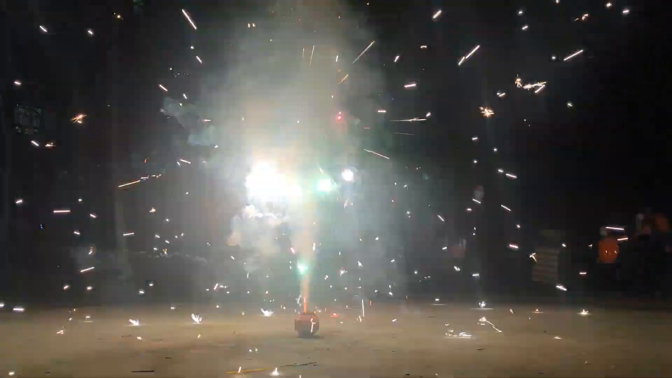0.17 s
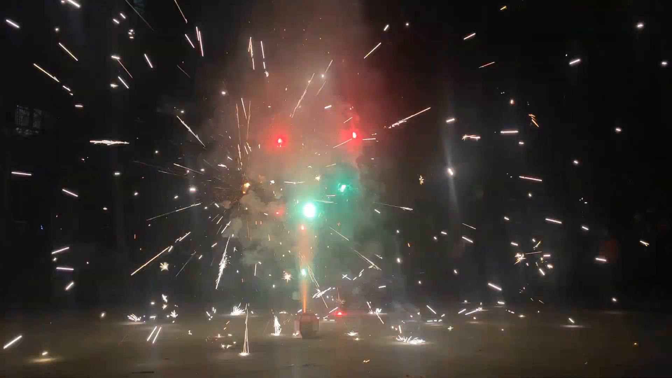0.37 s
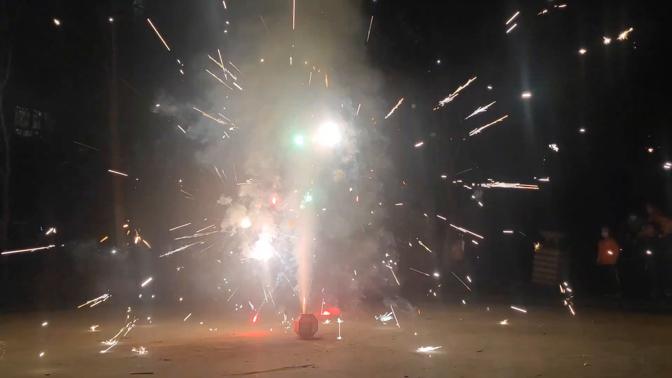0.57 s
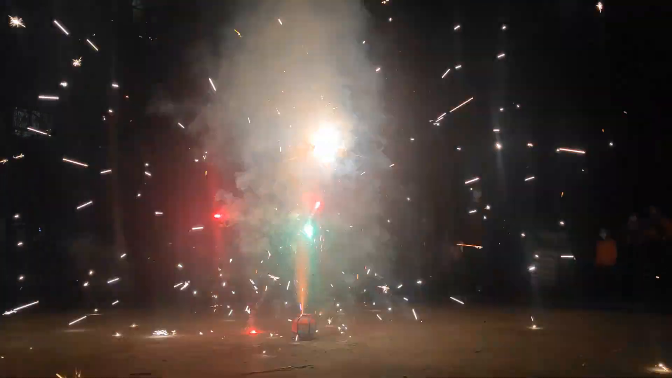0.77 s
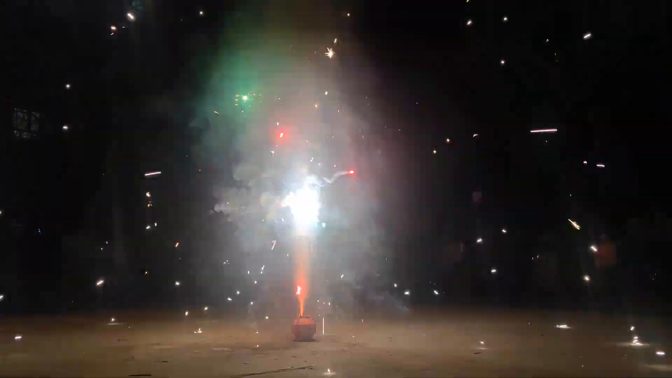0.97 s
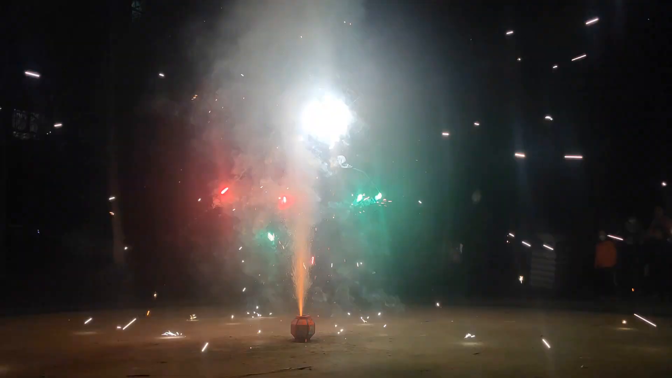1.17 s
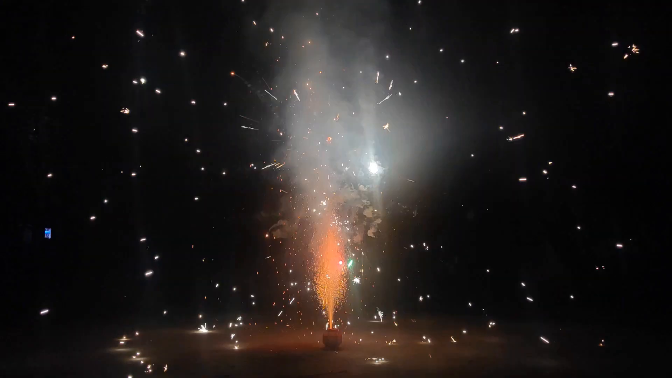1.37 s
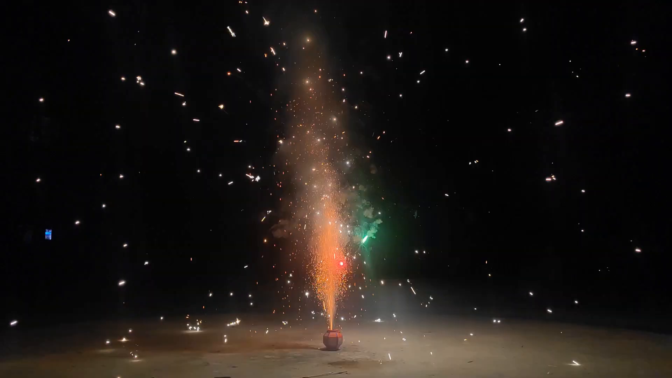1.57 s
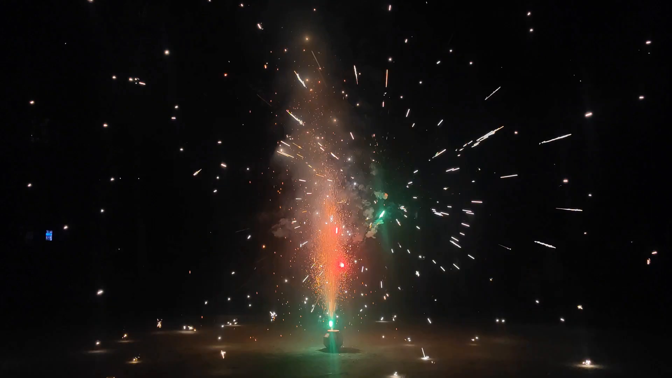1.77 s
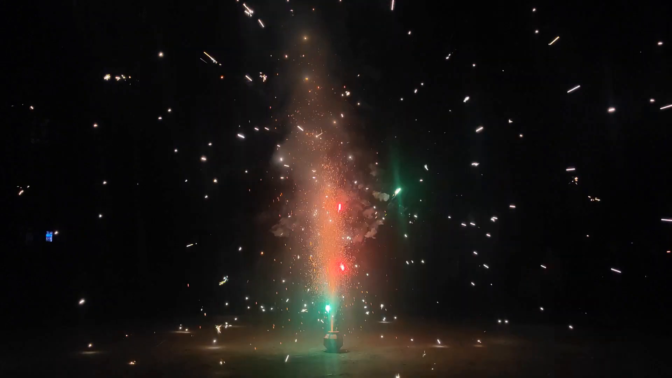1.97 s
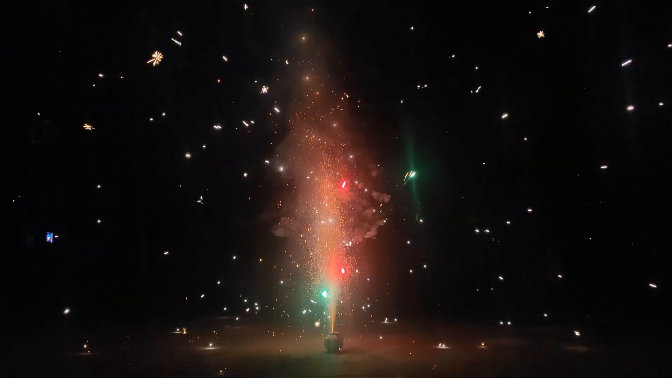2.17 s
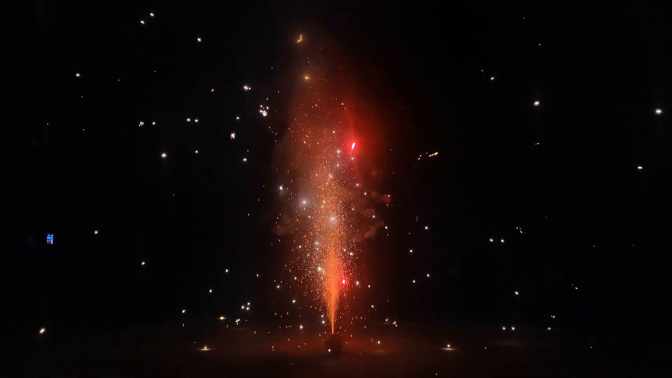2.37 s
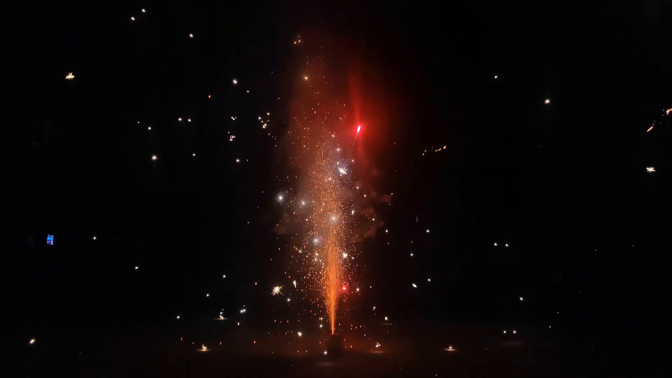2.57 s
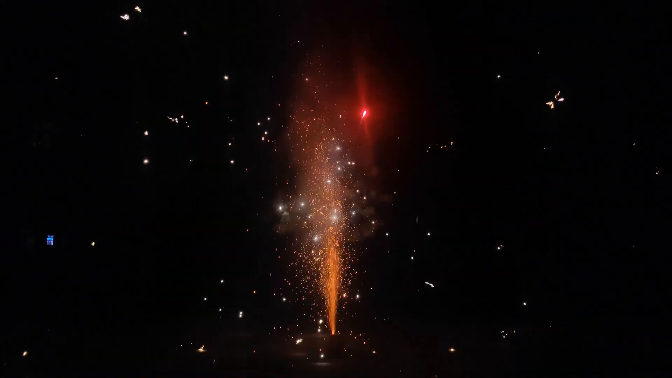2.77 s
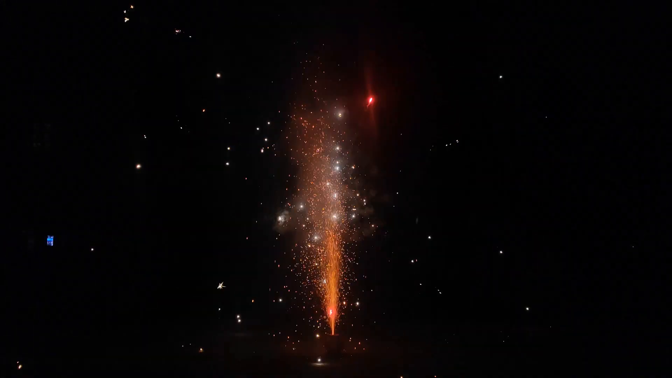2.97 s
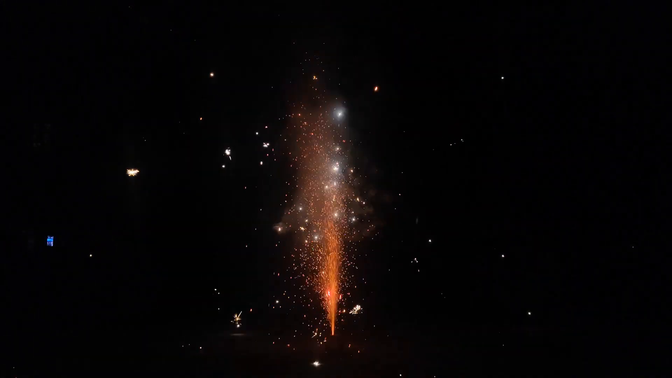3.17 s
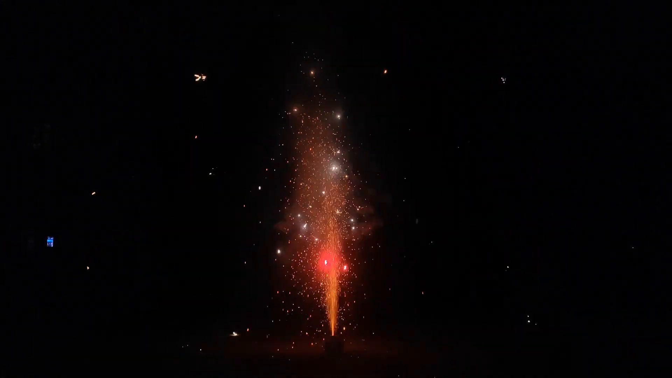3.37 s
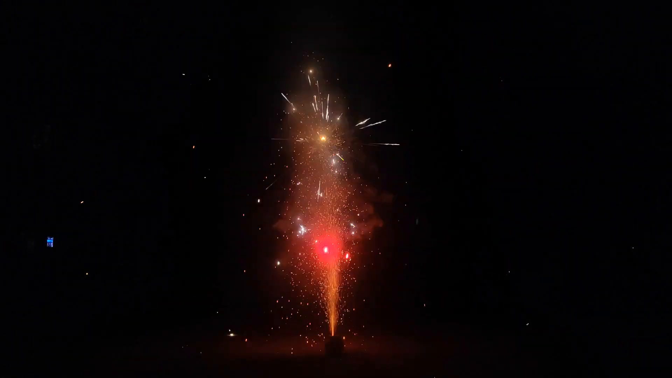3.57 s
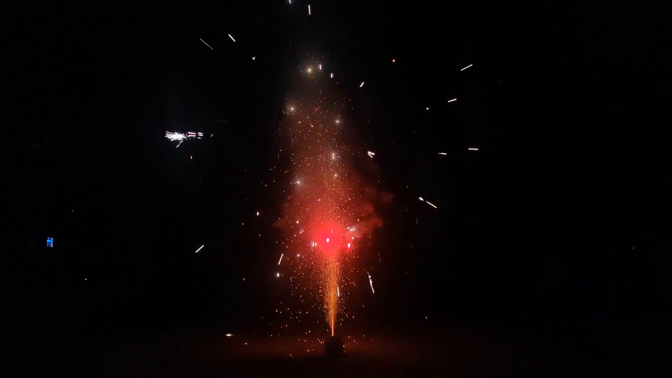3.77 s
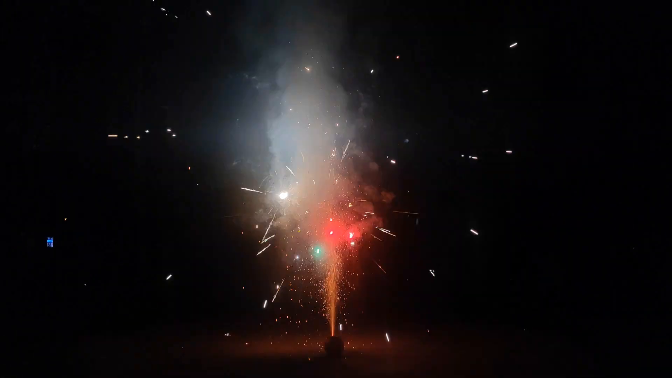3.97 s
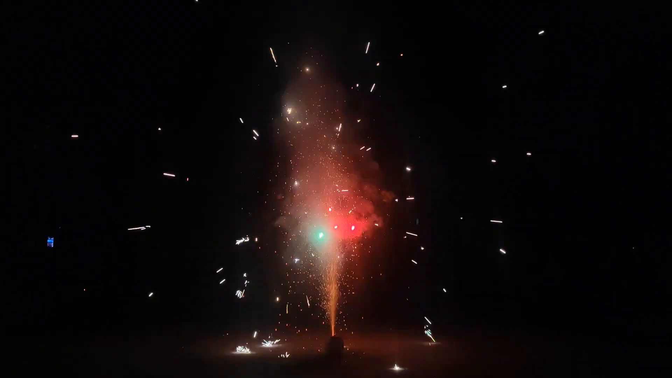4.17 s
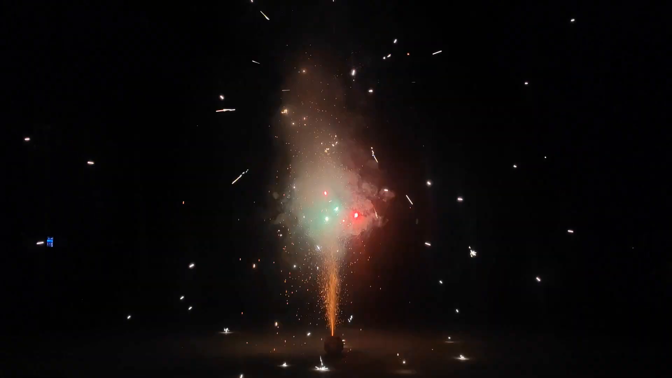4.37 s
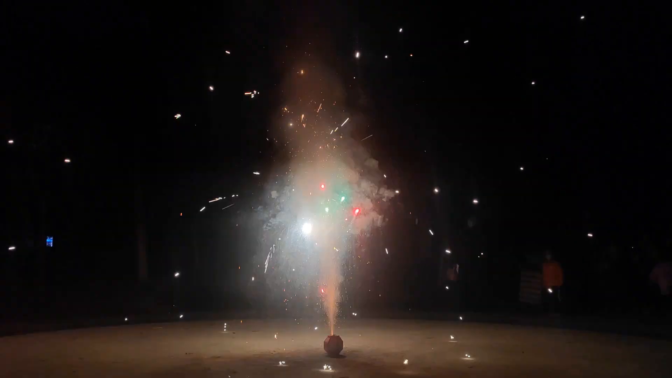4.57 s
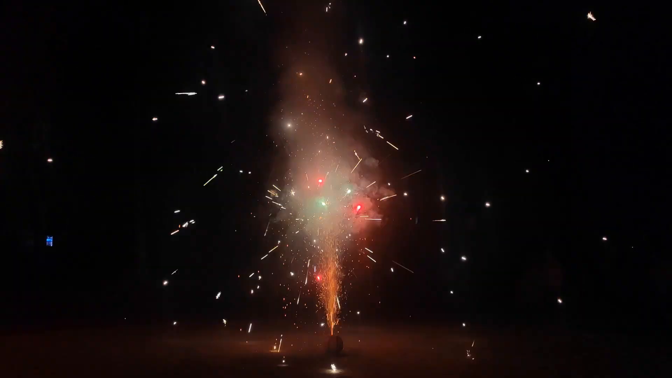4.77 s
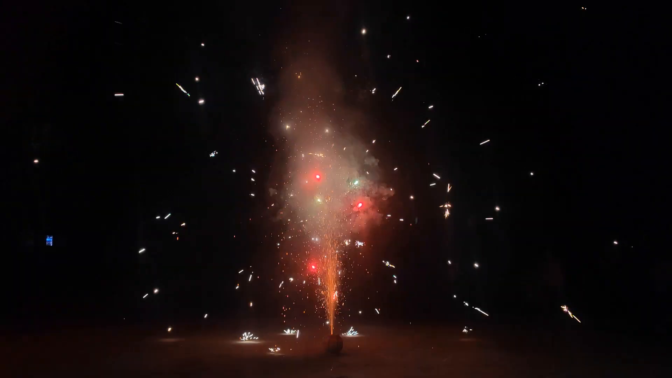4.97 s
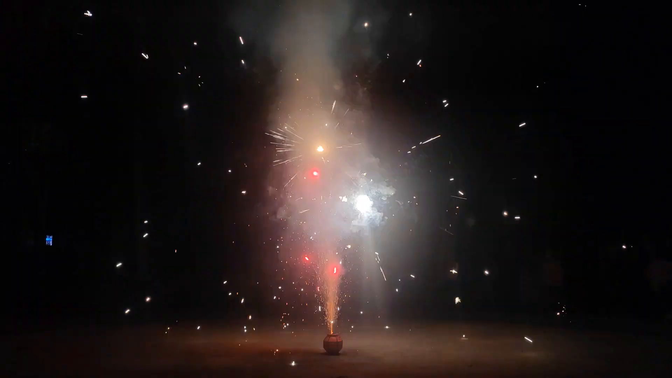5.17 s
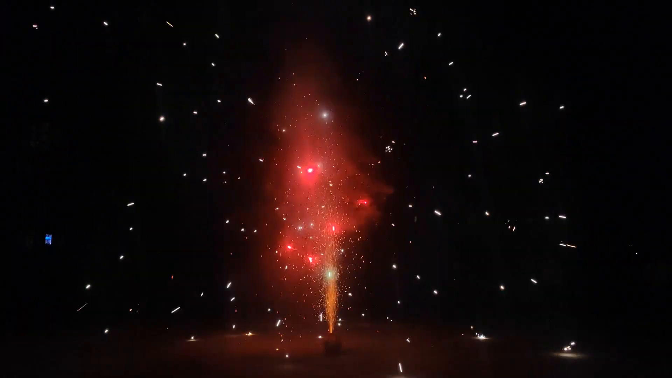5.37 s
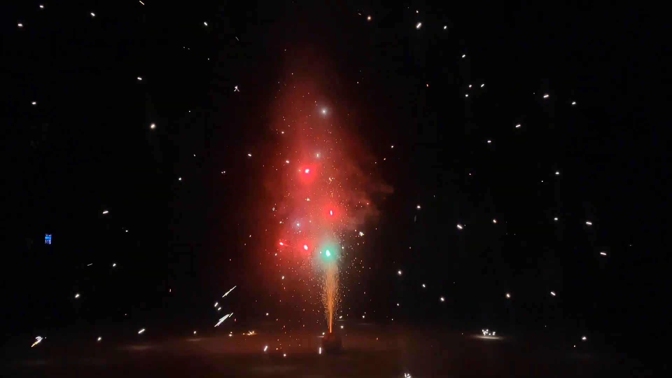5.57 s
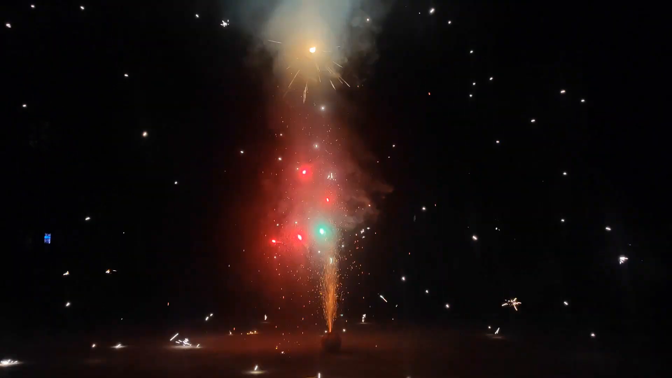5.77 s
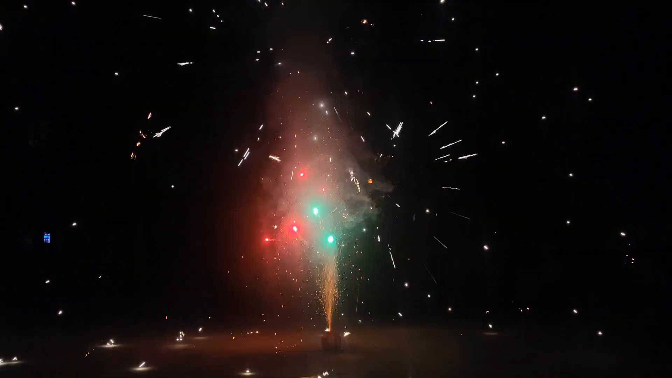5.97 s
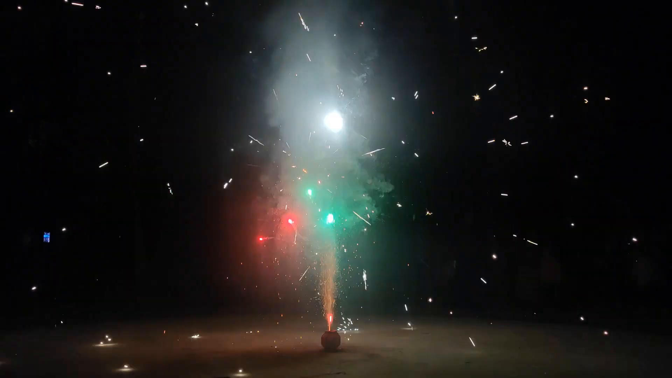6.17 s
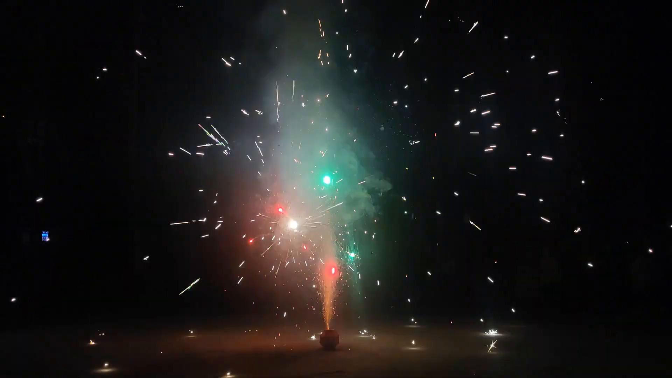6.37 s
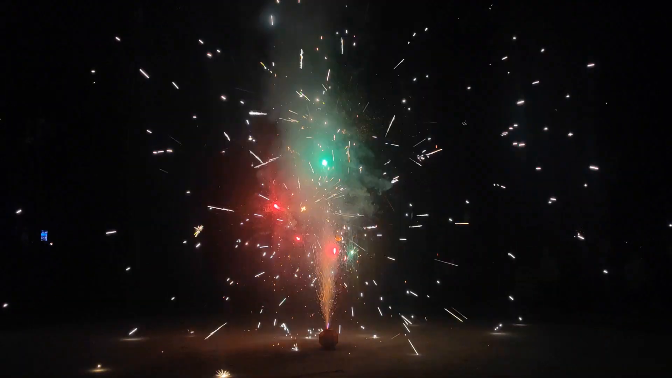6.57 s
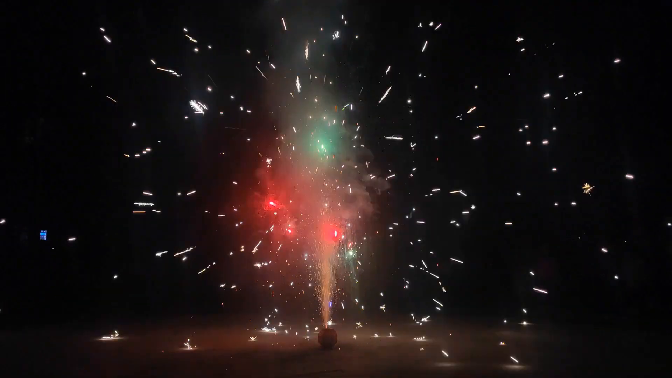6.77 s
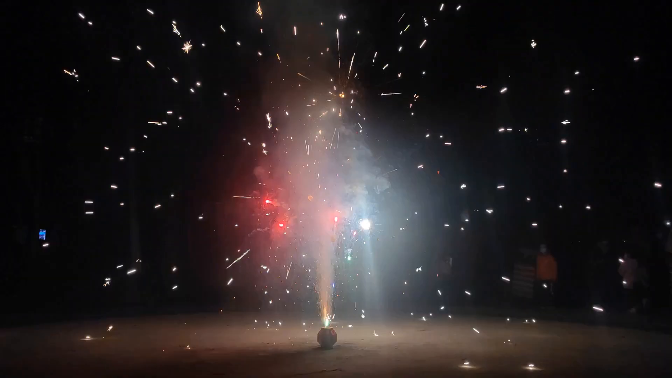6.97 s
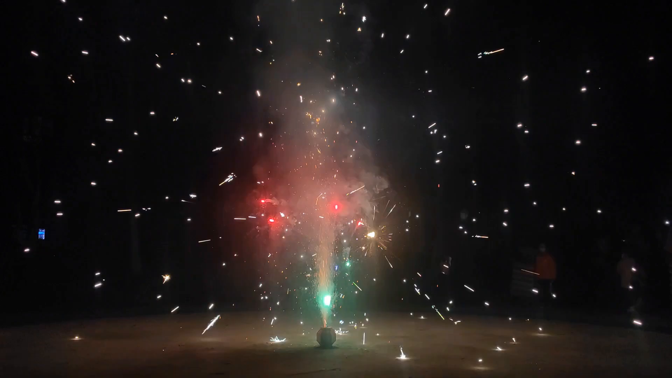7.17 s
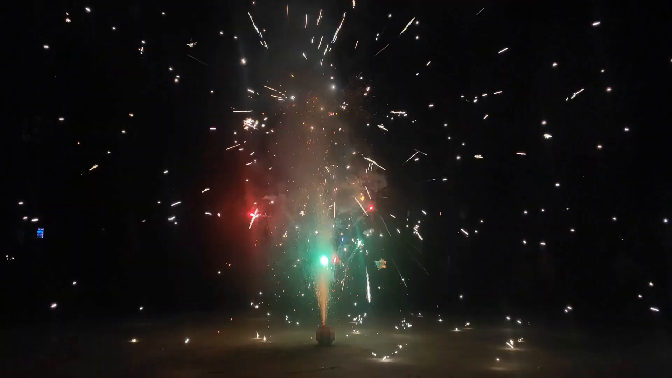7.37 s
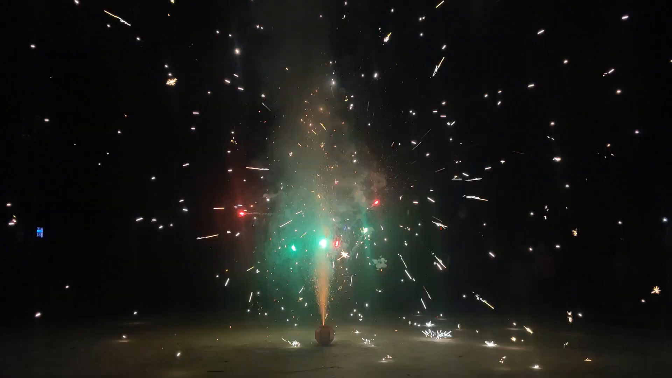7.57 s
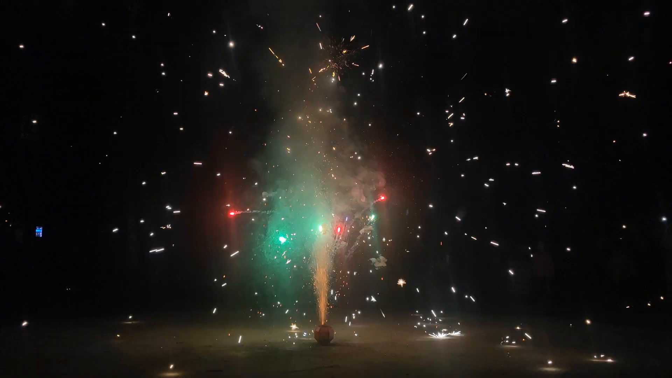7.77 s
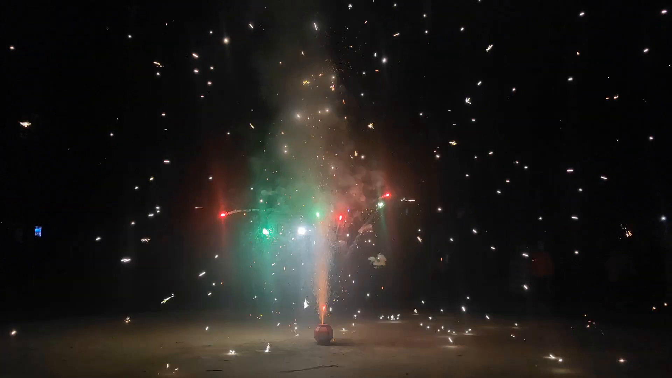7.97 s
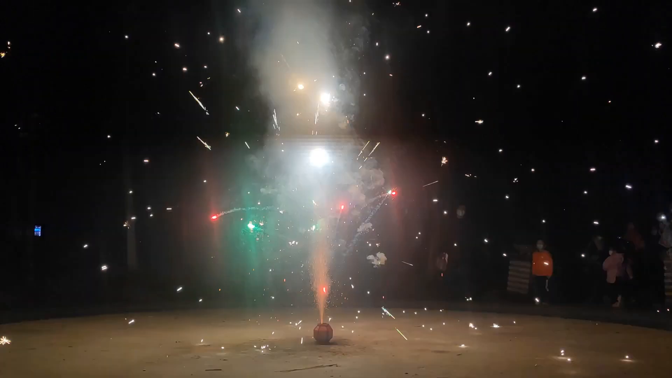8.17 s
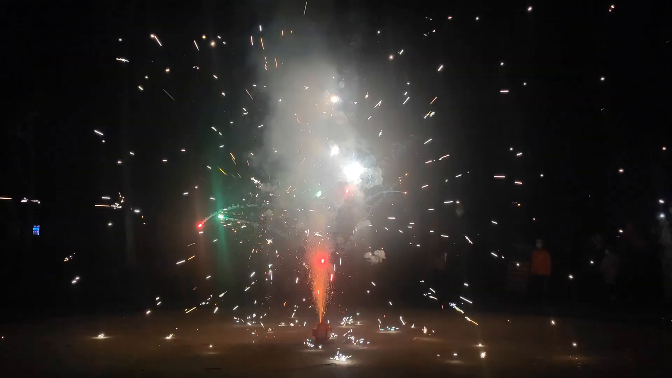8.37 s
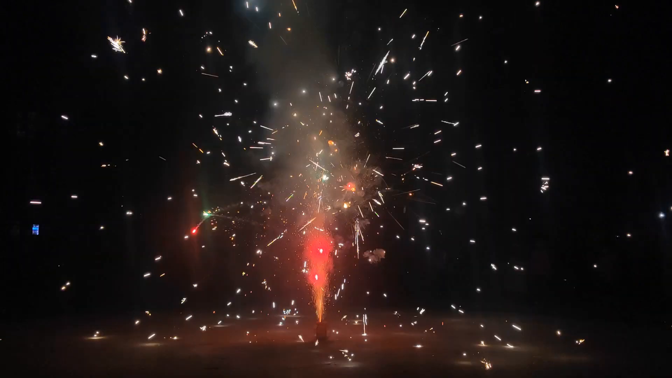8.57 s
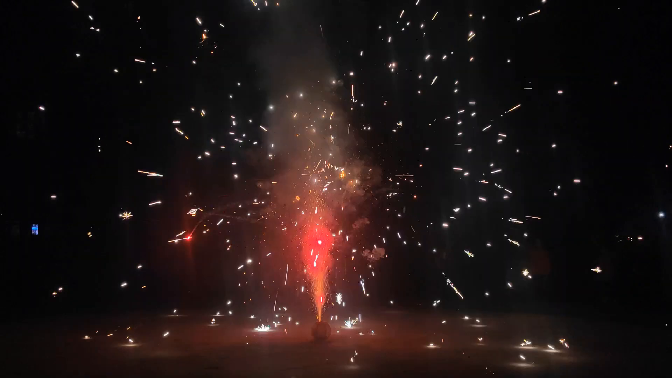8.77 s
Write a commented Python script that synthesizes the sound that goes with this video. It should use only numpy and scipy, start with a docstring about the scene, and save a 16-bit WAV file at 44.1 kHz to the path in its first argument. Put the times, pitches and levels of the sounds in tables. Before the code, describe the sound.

Outdoors at night in a paved yard, a ground firework fountain is heard in stereo through an overloading phone. From 0 to 1.25 s, at normal speed, stars explode in a frantic volley of some thirty to forty sharp, noisy bangs, with bright spark hiss, dense crackle, short hard yard reflections and diffuse echoes from distant houses. Around 1.25 s the sound dips abruptly, then fades back five times slower and much duller. Stretched, low thuds with lumpy, rumbling tails continue until about 2.2 s. From 2.3 to 4.1 s there is a lull: echoes fade, a muffled grainy roar swells around 3.3 s, and a few single sparks snap near 3.35, 3.7, 3.9 and 4.0 s. Heavy thuds return at 4.15 s, strong near 5.2 s, then come irregularly and often, with murky crackle between, until about 8.8 s.

```python
"""A ground fountain firework roars with noise, hissing and crackling with showers of random clicks.
From the start its stars burst in quick bangs of noise that shove and overload a phone's two microphone ports.
Fading noise echoes the bangs round a paved yard, then from distant houses.
After a moment at normal speed the sound dips, and the phone plays the scene five times slower:
the crackle turns into dull, drawn-out thuds, and in a lull a few single sparks snap."""
import sys
import numpy as np
from scipy import signal
from scipy.fft import rfft, irfft
from scipy.io import wavfile
from scipy.ndimage import uniform_filter1d, minimum_filter1d

SR = 44100
rng = np.random.default_rng(int(sys.argv[2]) if len(sys.argv) > 2 else 0)


def amp(db):
    return 10 ** (np.asarray(db, float) / 20)


def write(x):
    x = np.atleast_2d(x).T
    wavfile.write(sys.argv[1], SR, np.round(np.clip(x, -1, 1) * 32767).astype(np.int16))


N = 388080
SLOW = 5  # times slower
SLOW_FROM_S = 1.262
# samples at the firework's own speed, with a small margin
LIVE = round((SLOW_FROM_S + (N / SR - SLOW_FROM_S) / SLOW) * SR) + 200


def read(points, hz):
    """Reads a curve of (f/Hz, value) points, joined by straight lines on a log frequency axis."""
    f, value = np.transpose(points)
    return np.interp(np.log(hz + 1), np.log(f + 1), value)


def live(s):
    """Turns time as played into time at the firework."""
    return np.where(s < SLOW_FROM_S, s, SLOW_FROM_S + (s - SLOW_FROM_S) / SLOW)


def level_curve(points):
    """Gain over time at the firework, from (t/s as played, level/dB) points; returned in dB."""
    s, db = np.transpose(points)
    return np.interp(np.arange(LIVE) / SR, live(s), db)


def train(s, size):
    """One click of the given size at each time."""
    out = np.zeros(LIVE + SR)
    np.add.at(out, np.round(s * SR).astype(int), size)
    return out[:LIVE]


# resonances of the left and right microphone ports: (f/Hz, level/dB), only the shape counts
LEFT_PORT = [(1000, -9.5), (2250, -5), (3500, -6.5), (5000, -7), (6750, -9), (7800, -5.5), (9000, -17),
             (11500, -18), (14500, -19.5), (16000, -17), (18000, -23), (19500, -28.5), (20500, -37.5)]
RIGHT_PORT = [(1000, -11.5), (2500, -4.5), (4000, -2), (4750, 1.5), (6250, -1), (7500, -10.5),
              (8500, -25.5), (10500, -18.5), (13500, -15), (15000, -17.5), (16500, -16.5), (18000, -23.5),
              (19500, -32), (20500, -42.5)]


def through_ports(x, colour_db):
    """Colours two channels by the source and by each port's resonances; the ports' mean power gain is 1."""
    hz = np.fft.rfftfreq(LIVE, 1 / SR)
    gain = amp([read(LEFT_PORT, hz), read(RIGHT_PORT, hz)])
    gain = gain / np.sqrt(np.mean(gain ** 2))
    return irfft(rfft(x) * gain * amp(colour_db(hz)), LIVE)


# loudness of the roar: (t/s as played, level/dB)
JET_LEVEL = [(0, -29), (.5, -45), (1.2, -30.5), (2.2, -41.5), (3, -31), (3.3, -30), (3.55, -30.5),
             (3.8, -40.5), (4.4, -39), (5, -33), (7, -40), (8.8, -33)]
# tone of the roar: (f/Hz, level/dB), only the shape counts
JET_TONE = [(150, -1), (700, 6), (2000, -1.5), (4000, -7.5), (6000, -6.5), (8000, -20), (12000, -41.5)]


def jet(flutter_db=2.5):
    """Turbulent gas roars from the tube: coloured noise whose level flutters at random."""
    flutter = uniform_filter1d(rng.standard_normal(LIVE), 200) * np.sqrt(200)
    roar = through_ports(rng.standard_normal((2, LIVE)), lambda hz: read(JET_TONE, hz))
    return amp(level_curve(JET_LEVEL) + flutter_db * flutter) * roar / roar.std()


# tone of the spark hiss: (f/Hz, level/dB), only the shape counts
HISS_TONE = [(2000, -20), (6000, -4), (10000, 1), (15000, -2.5), (19000, 4.5)]


def sparks(hiss_db=-50, per_s=16000, spread_db=1.5, left_db=1.0):
    """Countless tiny sparks burn out: dense random clicks blend into a steady, grainy hiss."""
    lit = rng.random((2, LIVE)) < per_s / SR
    snaps = lit * amp(spread_db * rng.exponential(1, (2, LIVE)).clip(0, 4))
    hiss = through_ports(snaps * rng.standard_normal((2, LIVE)), lambda hz: read(HISS_TONE, hz))
    return amp([[hiss_db + left_db], [hiss_db - left_db]]) * hiss / hiss.std()


# loudness of the snapping sparks that stars scatter: (t/s as played, level/dB)
CRACKLE_LEVEL = [(0, -25.5), (.6, -28), (1.2, -28), (2.2, -42.5), (3, -58), (4.1, -62), (4.6, -44.5),
                 (6.5, -39.5), (8.8, -40.5)]
# tone of those snaps: (f/Hz, level/dB), only the shape counts
CRACKLE_TONE = [(1000, -23.5), (3000, -13.5), (6000, -11), (9000, -2), (12000, 0.5), (15000, -0.5),
                (19000, -2)]


def crackle(per_s=3000, spread_db=3, apart_db=4):
    """Stars scatter snapping sparks: sharp random clicks, each leaning left or right by chance."""
    lit = rng.random(LIVE) < per_s / SR
    size = lit * amp(spread_db * rng.exponential(1, LIVE).clip(0, 4))
    lean = amp(apart_db * rng.standard_normal(LIVE) * [[1], [-1]])
    snaps = size * rng.choice([-1., 1.], (2, LIVE)) * lean
    snaps = through_ports(snaps, lambda hz: read(CRACKLE_TONE, hz))
    return amp(level_curve(CRACKLE_LEVEL)) * snaps / snaps.std()


# bursting stars: (t/s as played, burst level/dB before its tone is set,
# relative low push on the membranes before it is shared between the ports, echo level/dB against the burst)
STAR_BANGS = [(.003, -12, .15, 2.5), (0.0227, -11.5, .3, -0.5), (0.0337, -13.5, 0.3, 1),
              (0.0518, -10.5, 0.25, 3), (0.0884, -7.5, .67, 1.5), (0.1141, -9.5, 0.61, 2),
              (0.1271, -11.5, .32, -7), (0.1606, -14.5, .33, -3), (.1993, -11, 0.85, 1),
              (0.2397, -11.5, 0.13, -1), (0.266, -10.5, .25, 0.5), (.297, -13.5, 0.18, -4.5),
              (0.3199, -8.5, 0.16, 0), (0.3446, -8, .38, -1), (0.3621, -8.5, .3, -8), (0.378, -11, .39, -3),
              (0.399, -7.5, 0.37, -2), (.419, -11, .22, 0.5), (0.4468, -10, 0.42, 3),
              (0.4868, -10, 0.13, 0.5), (.5065, -13.5, .23, 1), (0.54, -9, .25, -1), (0.574, -10.5, .2, -3),
              (.5862, -11.5, 0.13, -6), (0.6456, -9.5, .53, 1.5), (.681, -6, 0.2, -2), (.692, -9.5, .46, 1),
              (0.7176, -6, 0.53, 2), (.7593, -8, .26, -2), (0.8148, -9.5, 0.19, -1), (0.8404, -8, .35, 1.5),
              (.861, -11.5, .44, -4.5), (0.9185, -7.5, .31, -6), (.954, -12, 0.34, 6),
              (1.0048, -13.5, 0.33, -2), (1.0742, -11, .29, 5.5), (1.121, -13.5, 0.38, 9),
              (1.2007, -5, 0.26, 1), (1.251, -14.5, .14, 1), (1.303, -18, 0.21, 6.5),
              (1.335, -13.5, .27, 4), (1.3998, -15, 0.28, 1.5), (1.4489, -9.5, 0.24, -0.5),
              (1.657, -11, .04, 0), (1.79, -12, 0.2, 5), (1.9476, -9.5, .2, -2.5),
              (2.0069, -7.5, 0.17, -6.5), (2.218, -7.5, 0.14, -3.5), (4.1443, -7, 0.53, -3.5),
              (4.458, -6, .06, -3.5), (4.5135, -7, 0.36, 0.5), (4.864, -6, 0.41, -0.5),
              (5.0753, -8.5, .22, -5), (5.2126, -3.5, .35, -1.5), (5.285, -9.5, 0.31, -1),
              (5.5673, -7.5, 0.15, -2), (5.665, -10.5, .42, -0.5), (5.694, -9.5, .37, 3),
              (6.0756, -9, .31, -3), (6.3338, -6.5, .45, -1), (6.4417, -8.5, 0.22, -0.5),
              (6.5964, -12.5, 0.1, -10), (6.635, -7.5, 0.33, -1.5), (6.6734, -10.5, .27, 0.5),
              (6.7132, -13, .14, 0.5), (6.8499, -8.5, 0.66, -3.5), (6.9123, -10, 0.43, -2),
              (7.0055, -12, 0.16, -1), (7.091, -5.5, 0.49, -3.5), (7.1537, -11.5, 0.53, 0.5),
              (7.2722, -14.5, 0.17, -3), (7.4597, -7.5, 0.52, -0.5), (7.5357, -10, 0.16, -6),
              (7.5973, -10.5, 0.41, -8), (7.667, -8, 0.34, -13), (7.7165, -11, .07, 0),
              (7.913, -9, .35, 1.5), (8.0706, -11, .1, -0.5), (8.2304, -9.5, 0.19, -2),
              (8.5427, -8.5, .15, -0.5), (8.6664, -13, .13, 2), (8.6943, -8.5, .29, -.5),
              (8.7293, -11.5, 0.19, -3), (8.7787, -13.5, 0.25, -6.5)]


def stars(second_share=0.36, after_s=.006, wait_s=.004, second_db=-7, vary_db=2.5,
          second_echo_db=-6, second_push=0.71, push_left_db=0.5):
    """Bangs at true speed, as rows: t/s, burst dB, left push, right push, echo dB; some stars break in two."""
    s, db, push, echo_db = np.transpose(STAR_BANGS)
    turn, second_turn, luck, wait, size = rng.random((len(STAR_BANGS), 5)).T
    two = luck < second_share
    second_s = live(s) + after_s + wait_s * wait
    weaker_db = db + second_db + vary_db * (2 * size - 1)
    # a random angle shares each push between the ports: real part left, imaginary part right
    first_push = push * np.exp(2j * np.pi * turn)
    weaker_push = second_push * push * np.exp(2j * np.pi * second_turn)
    at = np.r_[live(s), second_s[two]]
    db = np.r_[db, weaker_db[two]]
    push = np.r_[first_push, weaker_push[two]]
    echo_db = np.r_[echo_db, second_echo_db + 0 * s[two]]
    return np.array([at, db, amp(push_left_db) * push.real, amp(-push_left_db) * push.imag, echo_db])


def bursts(bangs, hold_s=0.0033, fall_s=0.0017, spiky_db=4.5, tilt_db=0.5, crack=0.66, crack_s=0.00092):
    """Blast and ground bounce together: a few ms of spiky noise, starting suddenly, each bang in its own tone."""
    t = np.arange(1000) / SR
    shock_front = crack * np.exp(-t / crack_s)
    shape = np.exp(-np.maximum(t - hold_s, 0) / fall_s) + shock_front
    tilt = tilt_db * rng.standard_normal(bangs.shape[1])
    spikes = rng.standard_normal((2, LIVE)) * amp(spiky_db * rng.standard_normal((2, LIVE)))
    spikes = spikes / spikes.std()
    dull = [(300, 3.5), (3000, -4.5), (6000, -4.5), (9000, -30)]
    bright = [(5000, -33), (8000, -7), (15000, 0.5)]
    out = 0
    for tilt_share, tone in ((-0.45, dull), (0.95, bright)):
        clicks = train(bangs[0], amp(bangs[1] + tilt_share * tilt) ** 2)
        power = signal.oaconvolve(clicks, shape ** 2)[:LIVE]
        out = out + np.sqrt(abs(power)) * through_ports(spikes, lambda hz: read(tone, hz))
    return out


def pushes(bangs, widths_s=(.0014, .0025, .0035), rebounds=(.5, .25, .11), sag_hz=7):
    """Each blast throws the membranes to one side; they swing back by a varying amount and creep home."""
    kind = rng.integers(0, 3, (bangs.shape[1], 2)).T
    t = np.arange(6000) / SR
    thrown = np.zeros((2, LIVE))
    for k, (width, rebound) in enumerate(zip(widths_s, rebounds)):
        u = t / width
        hump = u ** 4 * np.exp(4 - 4 * u) - rebound * (u / 2) ** 8 * np.exp(8 - 4 * u)
        for port in range(2):
            clicks = train(bangs[0], bangs[2 + port] * (kind[port] == k))
            thrown[port] += signal.oaconvolve(clicks, hump)[:LIVE]
    creep = .5 * (1 - np.exp(-t / .003)) * np.exp(-t / .04)
    for port in range(2):
        push = bangs[2 + port]
        clicks = train(bangs[0], push * abs(push))  # hard throws linger
        thrown[port] += signal.oaconvolve(clicks, creep)[:LIVE]
    return signal.lfilter(*signal.butter(1, sag_hz, "high", fs=SR), thrown)


def echoes(bangs, place, level_db, delay_s, spread_s, lumps_db, lump_s):
    """Surfaces spread in depth return every bang as lumpy noise; each band dies at its own speed."""
    s, burst_db, _, _, echo_db = bangs
    # power fed in, spread evenly around the delay
    fed = np.roll(train(s, amp(burst_db + echo_db + level_db) ** 2), round(delay_s * SR))
    fed = abs(uniform_filter1d(fed, 1 + round(spread_s * SR)))
    noise = rng.standard_normal((2, LIVE))
    centres = [row[0] for row in place]
    out = 0
    for k, (_, t60, db) in enumerate(place):
        share = list(zip(centres, np.arange(len(place)) == k))  # 1 at this band, 0 at the others
        band = through_ports(noise, lambda hz: 20 * np.log10(read(share, hz) + 1e-5))
        power = signal.lfilter([1], [1, -amp(-120 / t60 / SR)], fed)
        out = out + amp(db) * band * np.sqrt(power)
    lumps = signal.lfilter([1], [1, -np.exp(-1 / lump_s / SR)], rng.standard_normal((2, LIVE)))
    return out * amp(lumps_db * lumps / lumps.std())


# paved yard: (f/Hz, time to fall by 60 dB/s at true speed, level/dB relative between bands)
YARD_BANDS = [(150, 0.24, -0.5), (500, 0.11, 6.5), (1390, 0.14, -4.5), (3970, 0.29, -2.6),
              (8800, 0.39, 0.6), (17300, 0.15, 3.74)]


def yard_echo(bangs):
    """The paved yard answers within milliseconds."""
    return echoes(bangs, YARD_BANDS, level_db=-6, delay_s=0.0037, spread_s=0.0051, lumps_db=1.5, lump_s=0.0033)


# distant houses: (f/Hz, time to fall by 60 dB/s at true speed, level/dB relative between bands)
HOUSE_BANDS = [(150, .5, -16), (487, 0.97, -15), (1540, 0.94, -13), (2920, 0.63, -7), (5200, 0.43, -11),
               (8700, 0.24, -11.5), (17800, .3, -31)]


def house_echo(bangs):
    """Distant houses return a long, widely spread echo."""
    return echoes(bangs, HOUSE_BANDS, level_db=-4.5, delay_s=0.12, spread_s=0.25, lumps_db=1.0, lump_s=0.011)


# single sparks in the lull: (t/s as played, click level/dB before its tone is set, left minus right level/dB)
SINGLE_SPARKS = [(3.35, -27, 1), (3.678, -30, 3), (3.904, -31.5, 8), (4.0156, -29.5, -2)]


def ticks():
    """Single sparks snap: one brightly coloured click each."""
    s, db, pan_db = np.transpose(SINGLE_SPARKS)
    clicks = np.zeros((2, LIVE))
    clicks[:, np.round(live(s) * SR).astype(int)] = amp([db + pan_db / 2, db - pan_db / 2])
    return through_ports(clicks, lambda hz: read([(4000, -20), (9000, 6.5), (16000, 4)], hz))


def scene():
    """The firework at its true speed, then silence."""
    out = np.zeros((2, N))
    fountain = jet() + sparks() + crackle()
    bangs = stars()
    blasts = bursts(bangs) + pushes(bangs)
    out[:, :LIVE] = fountain + blasts + yard_echo(bangs) + house_echo(bangs) + ticks()
    return out


def gain_control(x, knee_db=-16, share=0.88, most_db=12, rise_db_s=60, ahead_s=0.0086):
    """Lifts quiet passages slowly; looks a little ahead and drops the lift just before a bang."""
    power_db = 10 * np.log10(abs(uniform_filter1d((x ** 2).mean(0), 150)) + 1e-12)
    lift_db = np.clip(share * (knee_db - power_db), 0, most_db)
    ahead = round(ahead_s * SR)
    lift_db = minimum_filter1d(lift_db, ahead, origin=-(ahead // 2))
    # the lift may drop at once but climb only at the set rate
    climb = np.arange(LIVE) * rise_db_s / SR
    lift_db = np.minimum.accumulate(lift_db - climb) + climb
    return x * amp(uniform_filter1d(lift_db, 40))


def overload(x):
    """The phone overloads softly: peaks bend over towards a ceiling of 0.7."""
    return x / (1 + abs(x / .7) ** 4) ** (1 / 4)


# mirror bands that the stretch filter lets through around the slowed sample rate: (f/Hz, level/dB)
MIRROR_LEAK = [(4250, 0.7), (4700, -68.5), (5200, -48.5), (6500, -48.5), (7000, -70.5), (7250, -51),
               (8000, -55.5), (8600, -54), (8800, -57), (9100, -58), (10200, -57), (10800, -85.5)]


def slow_motion(x, drop_s=1.245, drop_db=-16, fade_s=0.048):
    """Normal speed fades out, then the stretched sound fades in, with faint mirror bands above it."""
    start = round(SLOW_FROM_S * SR)
    size = N - start + 4000
    # samples set apart by zeros; the filter then fills the gaps
    spread = np.zeros((2, size))
    spread[:, :(LIVE - start) * SLOW:SLOW] = SLOW * x[:, start:]
    leak = amp(read(MIRROR_LEAK, np.fft.rfftfreq(size, 1 / SR)))
    spread = irfft(rfft(spread) * leak, size)[:, :N - start]
    t = np.arange(N) / SR
    fade_out = np.interp(t[:start], [drop_s, drop_s + .0005, SLOW_FROM_S], [1, amp(drop_db), .02])
    fade_in = np.clip(0.023 + (t[start:] - SLOW_FROM_S) / fade_s, 0, 1)
    # at normal speed the treble stops near 15.7 kHz
    edge = signal.firwin(511, 15700, window=("kaiser", 9), fs=SR)[None]
    normal = signal.oaconvolve(x[:, :start] * fade_out, edge, "same")
    return np.hstack([normal, spread * fade_in])


def roll_off(x):
    """The treble ends steeply here."""
    return signal.sosfilt(signal.butter(12, 16290, fs=SR, output="sos"), x)


def record(dry):
    """The phone evens out the level, overloads, loses the highest treble and goes into slow motion."""
    x = overload(gain_control(dry[:, :LIVE]))
    top_cut = [(19000, 0.805), (20800, -29.5), (22000, -64.5)]  # (f/Hz, level/dB)
    x = irfft(rfft(x) * amp(read(top_cut, np.fft.rfftfreq(LIVE, 1 / SR))), LIVE)
    mix = slow_motion(x)
    return roll_off(mix)


dry = scene()
out = record(dry)
write(out)
```